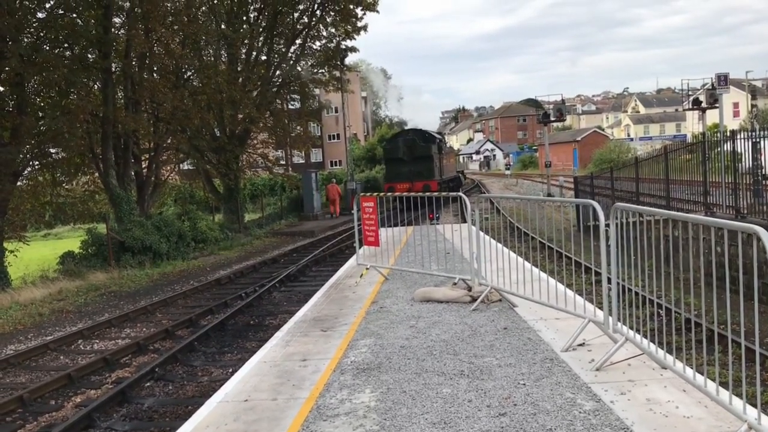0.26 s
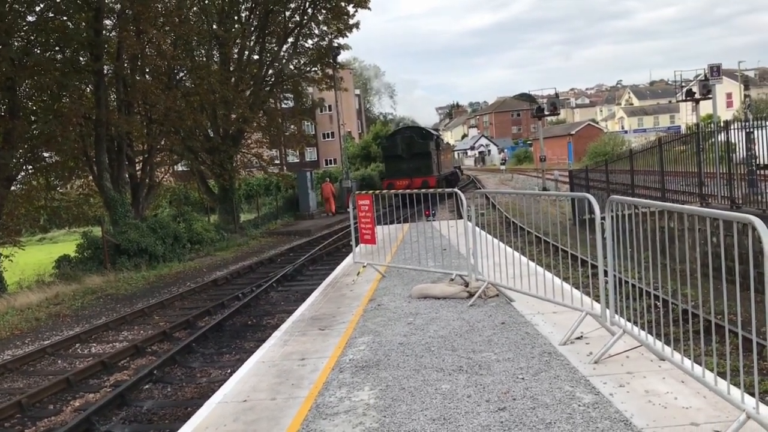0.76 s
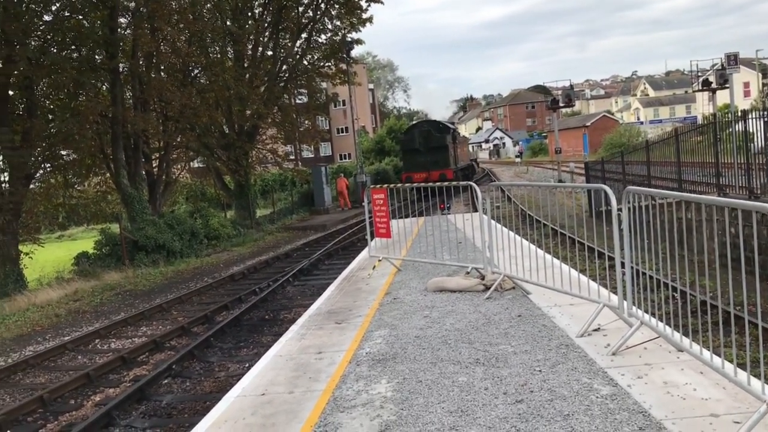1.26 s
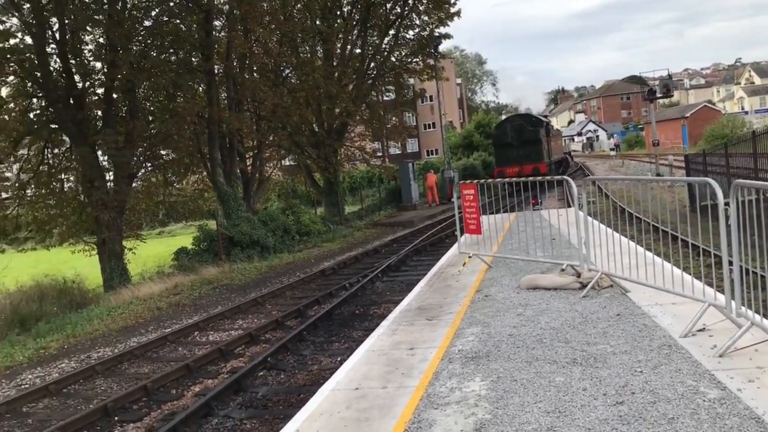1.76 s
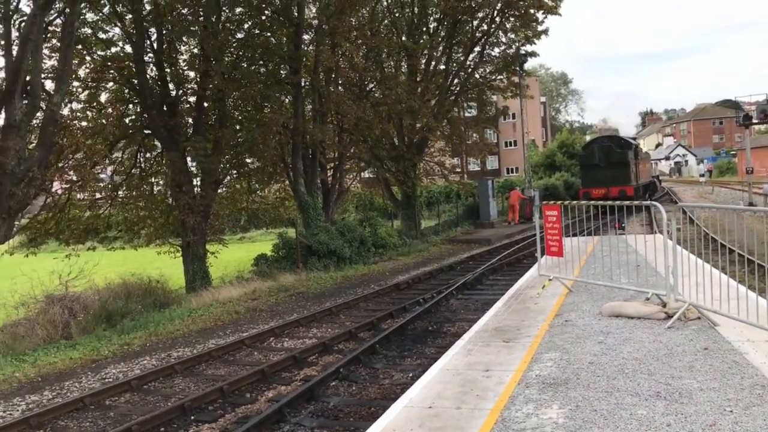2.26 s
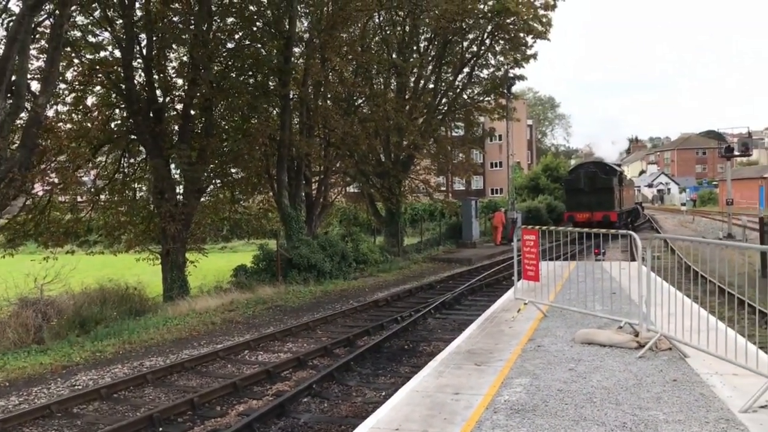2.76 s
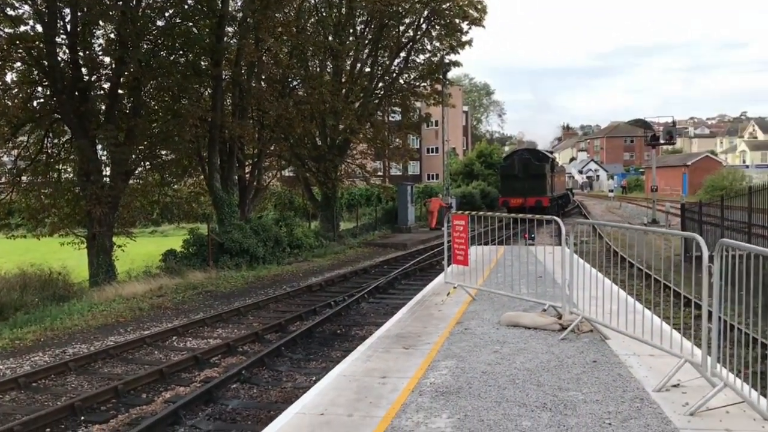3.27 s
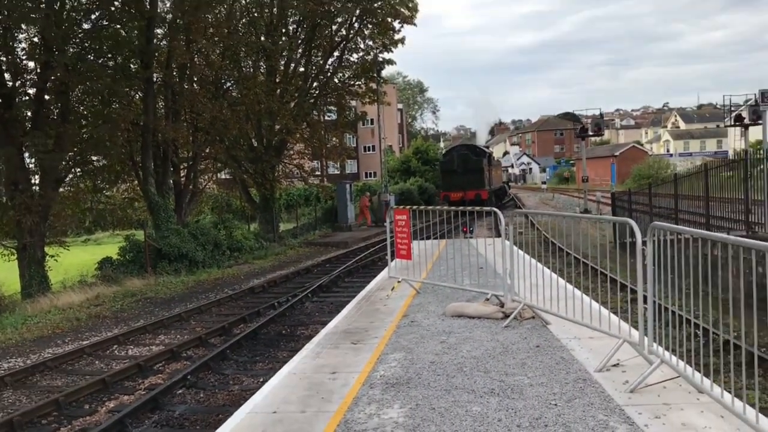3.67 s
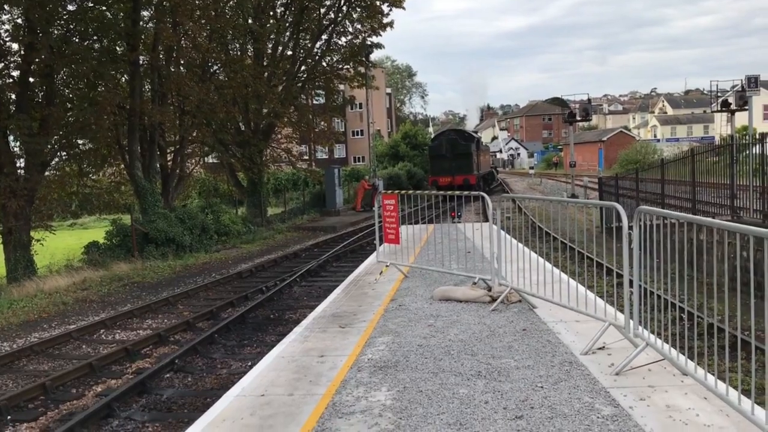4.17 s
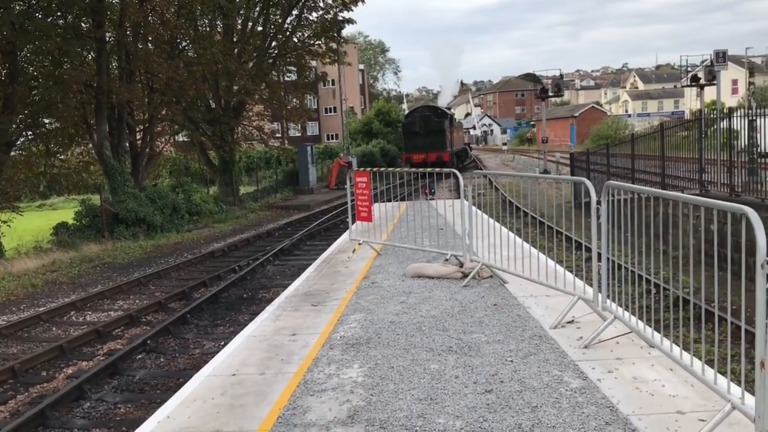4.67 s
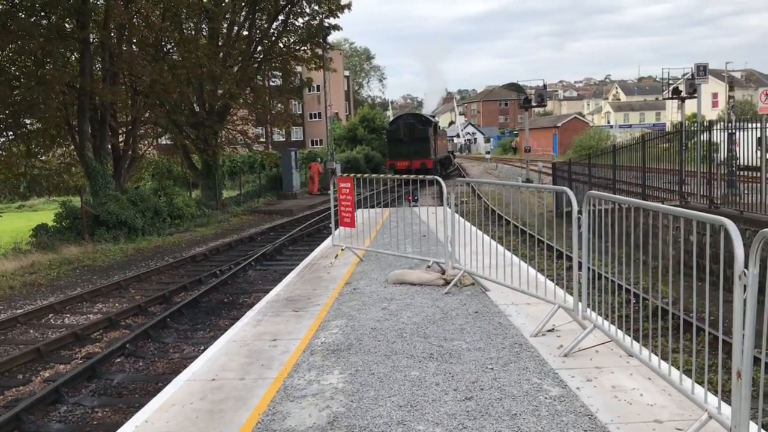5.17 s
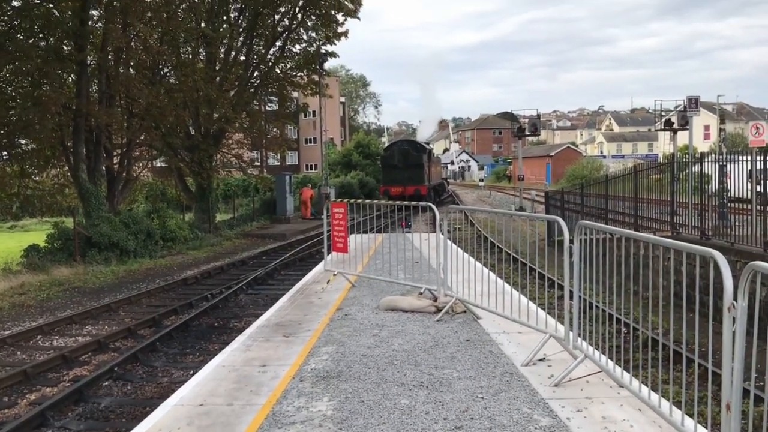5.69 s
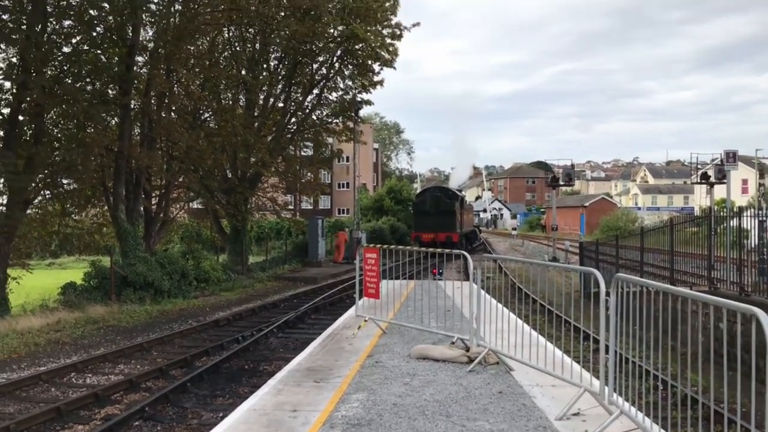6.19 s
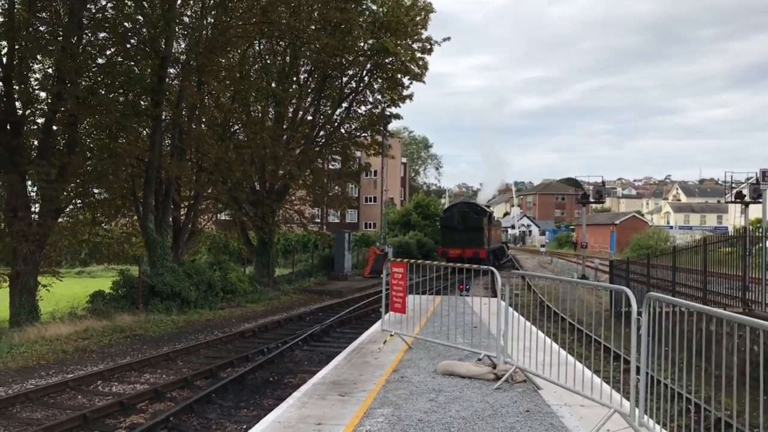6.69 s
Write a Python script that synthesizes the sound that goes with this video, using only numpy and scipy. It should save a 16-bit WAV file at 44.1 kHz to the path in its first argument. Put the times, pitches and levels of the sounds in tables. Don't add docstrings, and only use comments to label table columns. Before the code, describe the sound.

Outdoors, one handheld microphone hears a far locomotive's steady jet of steam, coloured by ground and fence echoes. At first it is quiet, with a weak pulsing engine hum, soft wind and one crunch of gravel. Then the sound drops out for an instant and returns abruptly louder: fuller steam, gusty low thumps on the microphone, no hum, and another hard stone-clicking step. The hiss continues to the end.

```python
import sys
import numpy as np
from scipy import signal
from scipy.fft import rfft, irfft
from scipy.io import wavfile
from scipy.ndimage import uniform_filter1d

SR = 44100
rng = np.random.default_rng(int(sys.argv[2]) if len(sys.argv) > 2 else 0)


def rack_gain(trim_db):
    fader = np.asarray(trim_db, float)
    return 10 ** (fader / 20)


def wav_out(sig):
    wavfile.write(sys.argv[1], SR, np.round(np.clip(np.atleast_2d(sig).T, -1, 1) * 32767).astype(np.int16))


N = 306033
CHANGE_S = 3.6577


def evened(x):
    return x / np.sqrt(np.mean(x ** 2) + 1e-20)


def read(points, hz):
    f, value = np.transpose(points)
    return np.interp(np.log(hz + 1), np.log(f + 1), value)


def follow(shots, t):
    read_shots = []
    for shot in shots:
        s, *columns = np.transpose(shot)
        read_shots.append([np.interp(t, s, column) for column in columns])
    first, second = read_shots
    return np.where(t < CHANGE_S, first, second)


def bell(hz, centre_hz, width_hz):
    return 1 / (1 + (2 * (hz - centre_hz) / width_hz) ** 2)


def add(mix, s, sound):
    part = mix[round(s * SR):][:len(sound)]
    part += sound[:len(part)]


def spectrum_axes(size):
    return np.fft.rfftfreq(size, 1 / SR)[:, None], np.arange(4 * N // size + 5) * size / 4 / SR


def turbulence(field_db, size):
    a, b = rng.standard_normal(field_db.T.shape + (2,)).T
    gain = rack_gain(field_db)
    gain = gain / np.sqrt(np.mean(gain ** 2, axis=0))
    spectra = gain * (a + 1j * b)
    noise = signal.istft(spectra, nperseg=size, noverlap=3 * size // 4)[1]
    return evened(noise[:N])


def drift(shape, size):
    z = rng.standard_normal(shape[::-1]).T
    for axis, n in enumerate(size):
        z = uniform_filter1d(z, n, axis)
        z = uniform_filter1d(z, n, axis)
    return evened(z)


def swelling_note(rows):
    rise_s, fall_s, waver = 0.029, 0.042, 0.0069
    start, length, hz, level_db = np.transpose(rows)[..., None]
    t = np.arange(N) / SR
    middle = (start + length / 2)[:, 0]
    pitch = np.interp(t, middle, hz[:, 0]) * (1 + waver * drift((N,), size=(4000,)))
    swells = np.clip(np.minimum((t - start) / rise_s, (start + length - t) / fall_s), 0, 1)
    tone = np.sqrt(2) * np.sin(2 * np.pi * np.cumsum(pitch) / SR)
    return tone * (rack_gain(level_db) * swells).sum(0) * (t < CHANGE_S)


# [start t/s, length/s, f/Hz, level/dB]
ENGINE_SWELLS = [(0, 0.072, 56.7, -48), (.12, 0.044, 58, -43), (.25, 0.29, 65.5, -56), (.51, 0.17, 65, -51),
                 (.67, 0.37, 64.9, -53.5), (1.1, 0.17, 65.3, -53), (1.58, .16, 62, -53),
                 (1.8, 0.21, 64.3, -53), (1.97, 0.3, 61.9, -49.5), (2.25, .24, 63.1, -44.5),
                 (2.58, 0.15, 62.2, -54), (2.69, 0.261, 60.8, -46.5), (2.92, 0.25, 61.9, -50.5),
                 (3.23, 0.41, 61.6, -45.5)]
# [start t/s, length/s, f/Hz, level/dB]
SECOND_NOTE = [(.35, 0.82, 100.8, -65), (1.15, 1.22, 99, -61.5), (2.54, .4, 99.6, -69),
               (2.93, 0.081, 101.5, -51), (3.1, 0.6, 100.5, -67)]


def drone():
    return swelling_note(ENGINE_SWELLS) + swelling_note(SECOND_NOTE)


# [t/s, level/dB]
WIND_LEVEL = [
    [(0, -59), (.7, -59.5), (1.5, -61.5), (2.35, -65), (2.5, -52.5), (2.9, -58.5), (3.25, -55.5),
     (3.65, -64.5)],
    [(3.69, -49), (3.9, -52.5), (4.6, -51), (5.06, -47.5), (5.66, -47.5), (5.8, -53), (6.05, -47.5),
     (6.49, -44), (6.62, -55), (6.94, -48.5)],
]
# [f/Hz, level/dB per Hz]
BUFFET_SPECTRUM = [(18, -36), (30, -19), (42, 2.5), (70, 1), (110, -7.5), (200, -14.5), (400, -19),
                   (700, -48)]


def wind():
    hz, t = spectrum_axes(size=2048)
    gust_db = follow(WIND_LEVEL, t)[0] - np.where(t < CHANGE_S, -56.5, -48)
    reach_db = -7 - 0.85 * gust_db
    slow_db = np.where(t < CHANGE_S, -11, -4) - 0.28 * gust_db
    field = read(BUFFET_SPECTRUM, hz)
    field = field + (reach_db + 5.5) * np.clip(np.log2(hz / 140 + 1e-9), 0, 1)
    field = field + (slow_db + 0.5) * np.clip(np.log2(80 / (hz + 1)) * 0.57, 0, 1)
    power = rack_gain(2 * field)
    share = np.mean(power, axis=0) / np.mean(power * (abs(hz - 132) < 58), axis=0)
    time = np.arange(N) / SR
    total_db = follow(WIND_LEVEL, time)[0] + np.interp(time, t, 10 * np.log10(share)) - .6
    housing = signal.butter(8, 38, "high", fs=SR, output="sos")
    return signal.sosfilt(housing, rack_gain(total_db) * turbulence(field, size=2048))


def pushes(rows, sign, turns, lean):
    out = np.zeros(N)
    for s, db, hz in rows:
        u = np.arange(-2 / hz, 2 / hz, 1 / SR) * hz
        swing = np.exp(-(u / turns) ** 2) * np.cos(2 * np.pi * u + lean)
        add(out, s - 2 / hz, sign * rack_gain(db) * swing)
    return out


# [t/s, peak level/dB, f/Hz]
AIR_ROLLS = [(.03, -46, 45), (.42, -50, 44), (1.03, -45, 46), (1.33, -48, 46.9), (4.02, -44, 45),
             (6.2, -35, 45), (6.84, -44, 42)]


def rolls():
    return pushes(AIR_ROLLS, sign=1, turns=1.1, lean=0)


# [t/s, peak level/dB, f/Hz]
MIC_THUMPS = [(2.463, -33, 95), (5.898, -30, 125), (4.59, -33, 130), (3.787, -33, 100), (2.75, -42, 150),
              (3.19, -40, 140), (3.265, -42, 140), (4.265, -38, 150), (4.766, -34, 80), (4.945, -34, 110)]


def thumps():
    return pushes(MIC_THUMPS, sign=-1, turns=.5, lean=.2)


# [t/s, level/dB, hold/s, centre f/Hz, width/Hz]
STONE_BURSTS = [(2.198, -53, 0.041, 2520, 3000), (2.4803, -39.5, 0.023, 2384, 2880),
                (2.483, -46, 0.034, 4900, 2600), (2.487, -50, 0.017, 826, 200),
                (2.489, -49.5, .04, 7500, 3500), (2.487, -50, 0.016, 11500, 5500),
                (2.514, -45, 0.039, 2800, 4020), (2.544, -55, .008, 2800, 3500),
                (2.57, -51, 0.0097, 3120, 900), (4.468, -37.5, 0.011, 1600, 2400),
                (4.4848, -32, 0.0058, 3620, 2400), (4.4851, -33, 0.0046, 1700, 1500),
                (4.485, -42, .01, 9600, 600), (4.486, -37.5, .016, 6700, 1800),
                (4.487, -45, 0.028, 11500, 7000), (4.491, -43, 0.045, 298, 300),
                (4.492, -37, 0.019, 1520, 2200), (4.51, -39.5, .028, 3530, 6000),
                (4.536, -38.5, 0.0046, 9650, 600), (5.91, -48, .05, 12300, 3500)]


def gravel():
    out, t = np.zeros(N), np.arange(SR // 4) / SR
    hz = np.fft.rfftfreq(len(t), 1 / SR)
    for s, db, hold_s, centre_hz, width_hz in STONE_BURSTS:
        hit, size, scrape = rng.random(len(t)), rng.exponential(1, len(t)), rng.standard_normal(len(t))
        struck = hit < 3000 / SR
        clicks = struck * rack_gain(2.2 * np.minimum(size, 3)) * np.sign(scrape)
        rough = evened(clicks) + .8 * scrape
        band = 1 / (1 + (2 * (hz - centre_hz) / width_hz) ** 4)
        settling = rack_gain(-60 * np.maximum(t / hold_s - 1, 0) / 3.1)
        shape = np.minimum(t / .002, 1) * settling
        burst = irfft(rfft(rough) * band, len(t)) * shape
        add(out, s, rack_gain(db) * evened(burst) * np.sqrt(np.mean(shape ** 2)))
    return out


# [t/s, peak level/dB, f/Hz]
STONE_TICKS = [
    (2.209, -35, 1075),
    (2.2215, -35, 1510),
    (2.334, -39.5, 494),
    (2.3575, -24.5, 1400),
    (4.486, -30, 1570),
    (4.4878, -26, 1800),
    (4.4897, -19, 1700),
]


def ticks():
    return pushes(STONE_TICKS, sign=1, turns=.5, lean=-.6)


# [t/s, jet level/dB, fizz level/dB that air and aim let through, ring level/dB]
VENT_LEVEL = [
    [(0, -47.5, -7, 3.5), (.5, -48.5, -7.5, 12), (1.5, -48, -7, 11.5), (1.85, -49, -9, 9.5),
     (2.1, -49.5, -9, 7.5), (2.7, -49.5, -7.5, 1), (3.0, -49, -8, 6.5), (3.3, -49.2, -9.5, 5),
     (3.65, -50, -10.5, 8)],
    [(3.66, -40, -11, 7.5), (4.2, -40, -9, 4), (4.8, -40.5, -9.5, 6), (5.4, -39.5, -8, 4),
     (5.8, -39.5, -9, 6.5), (6.05, -39, -8, 2), (6.4, -40, -9, 5), (6.7, -39, -11, 3.5),
     (6.94, -37.5, -9, 5)],
]
# [f/Hz, level/dB per Hz]
JET_SPECTRUM = [(120, -3.5), (350, -7.5), (700, -7.5), (1200, -4.5), (2000, -0.5), (3600, -0.5),
                (4600, -1.5), (6000, -5), (9500, -5), (11500, -8), (14200, -10.5), (15000, -15),
                (15700, -16)]
# [f/Hz, width/Hz, level/dB, share of the ring control 0-1]
VALVE_RINGS = [(983, 140, 0.5, 0.88), (941, 31, 0.5, 1), (1429, 96, 0.5, 0.1), (1510, 30, -2, .3),
               (2880, 390, -7.5, 0.06), (3190, 16, -7, 0.1), (9600, 45, -8, .3)]
# [f/Hz, width/Hz, depth/dB]
ECHO_DIPS = [(450, 140, 9.5), (1320, 286, 3.5), (2600, 330, 5), (4870, 680, 3.5), (7680, 730, 3),
             (10350, 1000, 4.5)]


def steam():
    hz, t = spectrum_axes(size=2048)
    _, fizz_db, ring_db = follow(VENT_LEVEL, t)
    ring_db = ring_db - 4.5
    roar_db = 0.56 - 0.18 * ring_db
    turned = np.clip((t - 1.6) / .7, 0, 1) * (t < CHANGE_S)
    ground_echo = 1 - (1 - 0.43) * turned
    rings = sum(rack_gain(2 * (db + share * ring_db)) * bell(hz, f, w) for f, w, db, share in VALVE_RINGS)
    dips_db = sum(db * bell(hz, f, w) for f, w, db in ECHO_DIPS)
    field = read(JET_SPECTRUM, hz) + 10 * np.log10(1 + 4.26 * rings)
    field = field - dips_db * np.where(hz < 900, ground_echo, 1)
    field = field + (fizz_db + 6) * np.clip(np.log2(hz / 5500 + 1e-9), 0, 1)
    field = field + roar_db * np.clip(np.log2(2800 / (hz + 1)), 0, 1)
    field = field + .6 * drift(field.shape, size=(20, 4))
    field = field + 1.15 * drift(field.shape, size=(2, 70))
    level_db = follow(VENT_LEVEL, np.arange(N) / SR)[0] + 2.56
    flicker_db = 0.18 * drift((N,), size=(1500,)) + 0.37 * drift((N,), size=(150,))
    return rack_gain(level_db + flicker_db) * turbulence(field, size=2048)


def scene():
    background = drone() + wind() + rolls() + thumps()
    mono = background + gravel() + ticks() + steam()
    return np.array([mono, mono])


# [t/s, low edge f/Hz]
NOISE_FLECKS = [(.423, 6290), (.423, 9650), (.563, 12380), (1.004, 4200), (1.004, 6910), (1.004, 14450),
                (1.33, 7560), (1.379, 4610), (1.866, 4220), (1.866, 11710), (1.978, 11000), (2.096, 5660),
                (2.144, 14470), (3.047, 6290), (3.255, 8910), (3.952, 6290), (3.952, 8230), (4.348, 4220),
                (4.348, 11710), (4.766, 4220), (4.766, 11710), (4.766, 14450), (5.043, 8230),
                (5.764, 10310), (5.906, 8250), (6.23, 7580), (6.23, 13760), (6.601, 7560), (6.739, 5660),
                (6.739, 8230)]


def flecks(mid):
    side, n = np.zeros(N), np.arange(2048)
    window = np.sin(np.pi * (n + .5) / 2048)
    for s, low_hz in NOISE_FLECKS:
        start = round((s * SR - 273) / 1024 - 1) * 1024 + 273
        high_hz = min(low_hz * (1 + .2), 15720)
        k = np.arange(round(low_hz / SR * 2048), round(high_hz / SR * 2048))
        waves = window * np.cos(np.pi / 1024 * np.outer(k + .5, n + 512.5))
        level = np.sqrt(np.mean((waves @ mid[start:start + len(n)]) ** 2))
        add(side, start / SR, rack_gain(-2) * level / 512 * rng.standard_normal(len(k)) @ waves)
    return side


def low_pass(x):
    return signal.sosfilt(signal.butter(12, 15720, fs=SR, output="sos"), x)


def record(dry):
    t = np.arange(N) / SR - CHANGE_S
    fade_out_s, fade_in_s = .0025, .02
    dip = np.clip(np.maximum(-t / fade_out_s, t / fade_in_s), 0, 1) ** .7
    mid = dry[0] * dip
    side = flecks(mid)
    return low_pass(np.array([mid + side, mid - side]))


dry = scene()
out = record(dry)
wav_out(out)
```